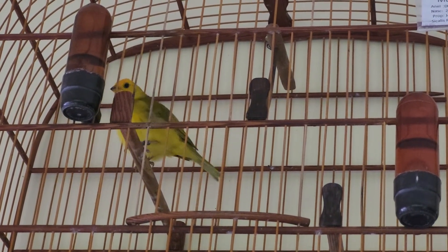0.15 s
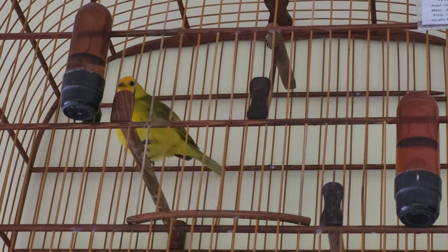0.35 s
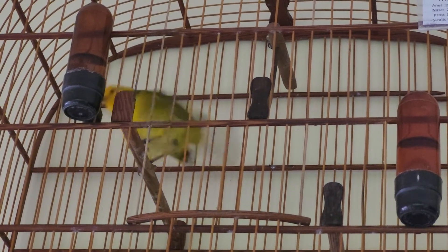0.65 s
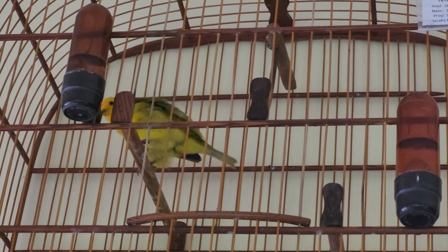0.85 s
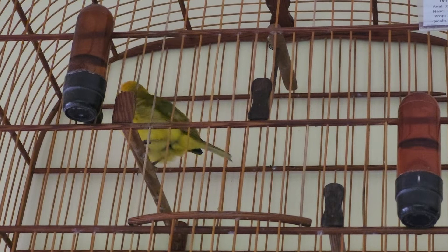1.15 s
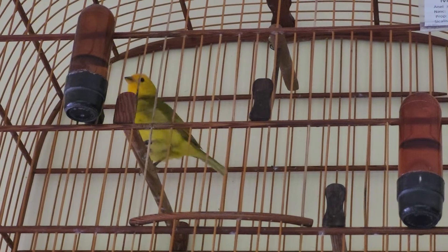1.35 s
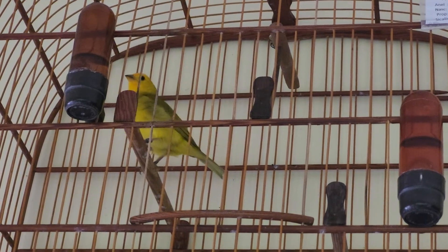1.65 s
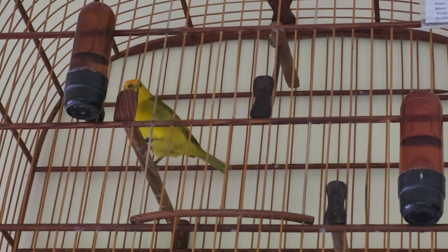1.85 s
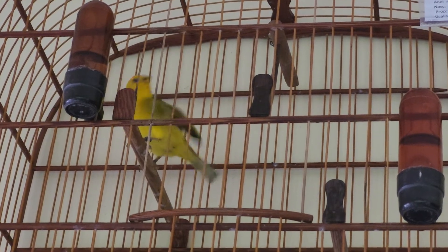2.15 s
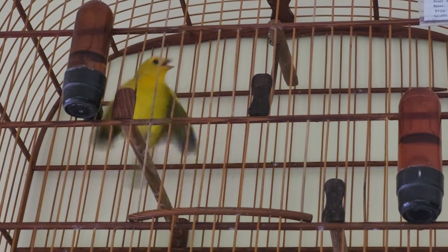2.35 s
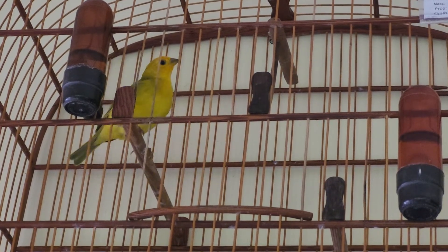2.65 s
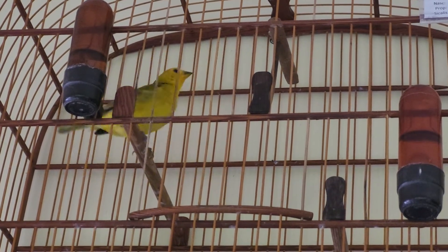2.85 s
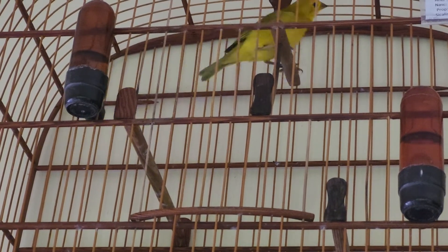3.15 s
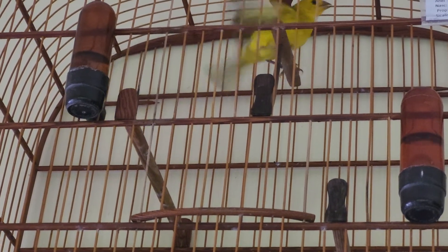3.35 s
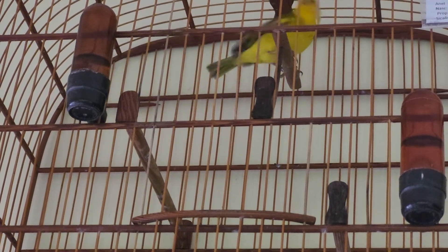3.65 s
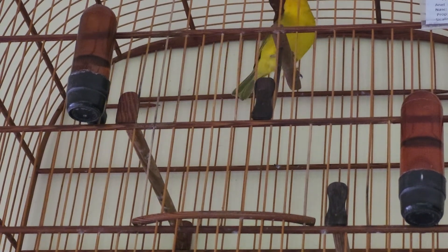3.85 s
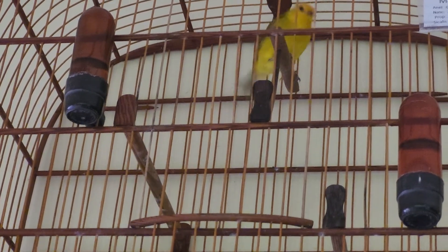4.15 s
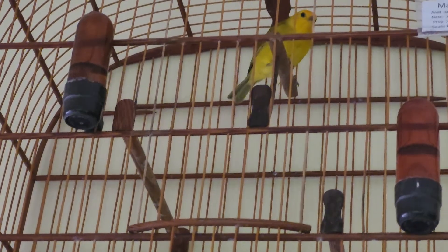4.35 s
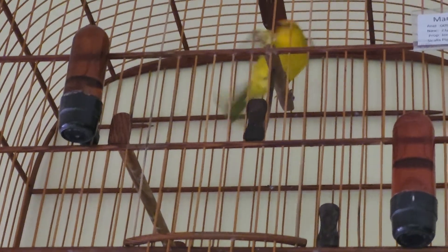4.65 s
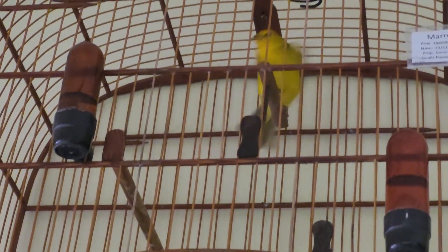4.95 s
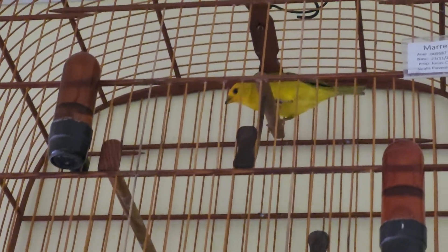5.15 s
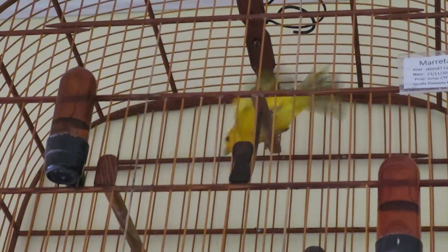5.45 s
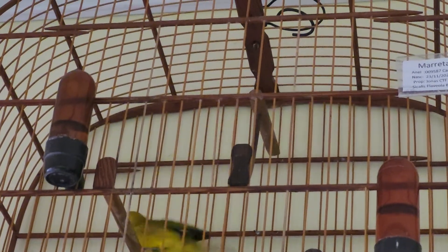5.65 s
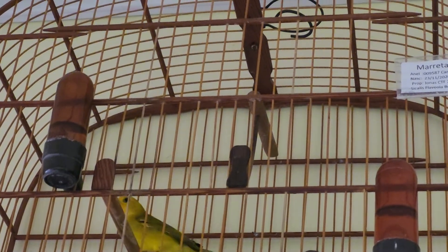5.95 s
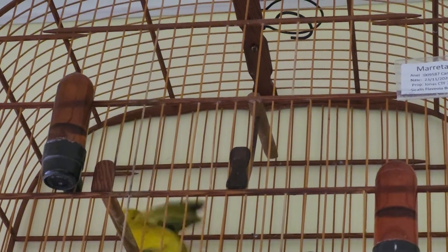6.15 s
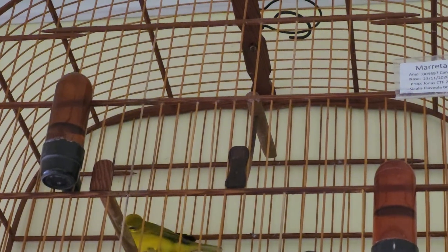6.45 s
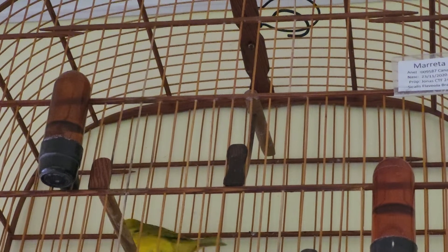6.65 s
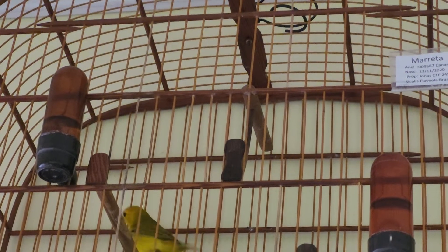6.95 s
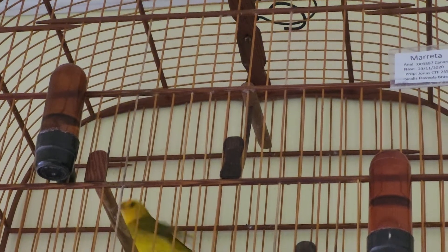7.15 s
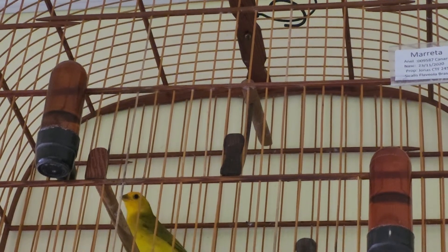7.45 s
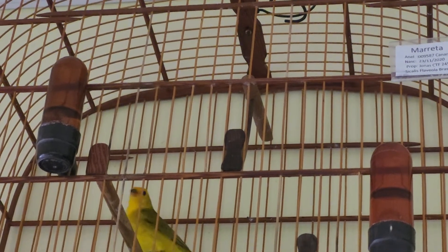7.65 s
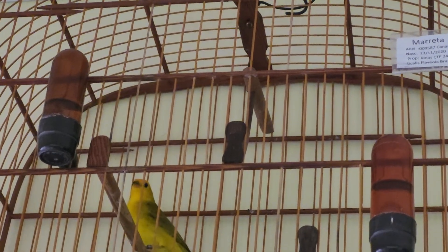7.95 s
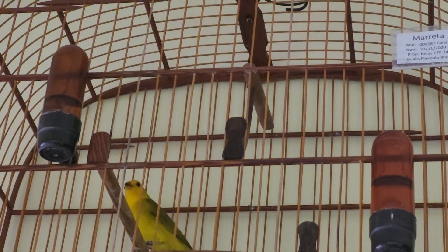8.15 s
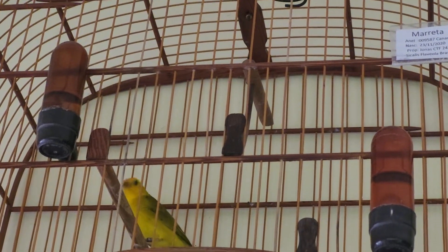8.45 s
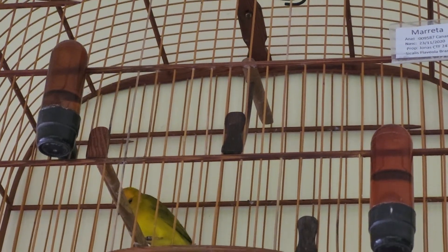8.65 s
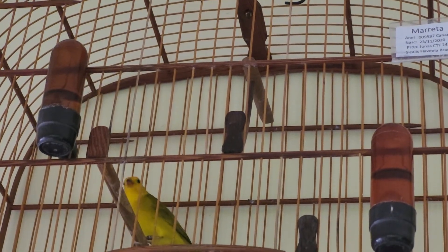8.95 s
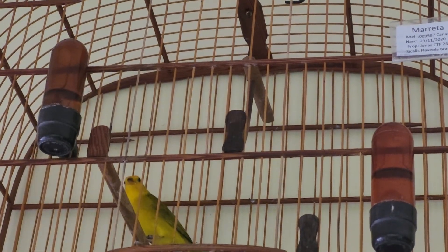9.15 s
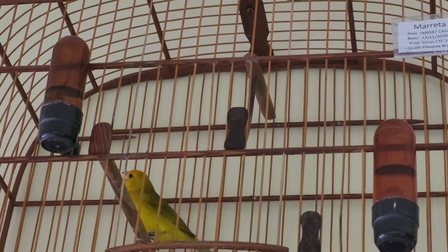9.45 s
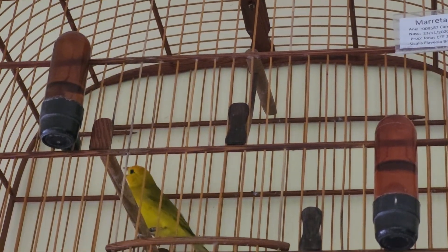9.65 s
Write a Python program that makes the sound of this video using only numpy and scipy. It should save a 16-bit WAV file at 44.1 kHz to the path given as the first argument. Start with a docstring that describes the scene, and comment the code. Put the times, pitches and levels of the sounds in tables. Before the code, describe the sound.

A small finch in a cage, close and slightly left in a hard-walled, echoing room. Six tiny, piercing, nearly pure chips around 8 kHz come at about 0.3, 1.5, 2.4, 3.4, 4.3 and 5.4 seconds, each dropping quickly onto its pitch and leaving a bright splash of echo. Faint dull ticks, claw scrapes and feather rustles accompany many chips, with small movements near 0.7, 4.0 and 5.7. From 6.65 the bird sings: a quick soft-to-loud pair, then sweeping falls near 7.1 and 7.7, a fast cluster at 8.1, a fuller run from 8.7 to 9.05, and another from 9.5 to 9.8, mostly plunging whistles with some rising ones. Very quiet traffic underneath hums and hisses, engines swelling around 3.3-4.5 and 5.5-7. Distant birds are only blurred echoes, clearest at the start and around 6.4.

```python
"""From the start, traffic hums, rumbles and hisses outside, swelling and sinking; far birds call as bare echo.
A caged finch in a hard-walled room gives six short chips, near-sine notes falling onto their pitch.
Dull ticks, scrapes (claws and feathers on the perch) and soft noise swells accompany many chips and
some song notes, and some fall between.
From 6.65 s the finch sings gliding whistles to the end; a decaying-noise echo smears every note."""
import sys
import numpy as np
from scipy import signal
from scipy.fft import rfft, irfft, next_fast_len
from scipy.io import wavfile
from scipy.ndimage import uniform_filter1d, minimum_filter1d

SR = 44100
rng = np.random.default_rng(int(sys.argv[2]) if len(sys.argv) > 2 else 0)


def materialize(psi):
    """Save the field psi as 16-bit PCM at rate SR to the path in sys.argv[1].

    A 1-D psi becomes a single channel; in a 2-D psi each row is a channel.
    """
    bounded = np.clip(np.atleast_2d(psi).T, -1, 1)
    quanta = np.round(bounded * 32767).astype(np.int16)
    wavfile.write(sys.argv[1], SR, quanta)


N = 433062

# finch chips; level applies 3 ms in, partial is the one at 1.5 x pitch:
# start_s, level_db, pitch_hz, left_minus_right_db, octave_db, partial_db, length_s
CHIPS = [(0.268, -11.5, 8048, 2, -41, -25, 0.01), (1.465, -12, 8040, 3, -23.5, -42, 0.012),
         (2.439, -11.5, 7767, 2, -9.5, -34.5, 0.0073), (3.39, -7, 7880, 1.5, -15, -45, 0.0057),
         (4.321, -9.5, 8096, 3, -30.5, -28.5, 0.0077), (5.385, -12.5, 8140, 5.5, -24, -31, 0.0088)]
# thin squeak ahead of a chip, level relative to it: offset_s, pitch_hz, level_db
CHIP_SQUEAK = [(-.01, 9630, -44.5), (-.006, 12460, -33.5), (0, 14500, -48)]
# finch song glides, levels before voice gain; bend > 1 moves fast then settles, < 1 holds then moves:
# start_s, length_s, from_hz, to_hz, bend, start_db, end_db, left_minus_right_db, octave_db
SONG = [(6.65, 0.022, 7000, 5930, 0.9, -32.5, -22.5, -1, -8.5),
        (6.681, 0.049, 8200, 3637, 1.83, -20, -14.5, 2.5, -16),
        (7.099, 0.051, 7925, 8630, 1.48, -12.5, -17.5, 5, -37),
        (7.152, 0.059, 8900, 3670, 1.84, -14, -15, 1.5, -22),
        (7.687, 0.07, 6210, 2374, 1.35, -13, -19, 3.5, -14.5),
        (8.117, 0.013, 9150, 7400, 0.79, -14.5, -17, 9, -14),
        (8.137, 0.0336, 8850, 6950, 0.48, -11, -14, 2, -16.5),
        (8.196, 0.037, 6370, 4067, 2.6, -9.5, -16.5, 2, -17.5),
        (8.225, 0.032, 4100, 2770, 1.5, -15.5, -17.5, 7, -7),
        (8.713, 0.031, 5030, 5626, 2.2, -29, -4.5, 5, -22.5),
        (8.742, 0.019, 5620, 6300, 1.2, -20, -22, 4.5, -15),
        (8.761, 0.051, 6310, 5956, 1.75, -13, -28, -3, -11.5),
        (8.832, 0.043, 6050, 3995, 2.15, -11.5, -19.5, 2.5, -15.5),
        (8.948, 0.014, 9230, 6900, 0.77, -17.5, -17, 3.5, -16),
        (8.967, 0.04, 8890, 6840, .4, -12.5, -19.5, 3.5, -18),
        (9.019, 0.055, 6176, 2760, 1.5, -13, -15, 3.5, -16),
        (9.47, 0.087, 4846, 6185, 1.29, -16.5, -8.5, 1, -17),
        (9.598, .046, 6060, 3860, 2.08, -8.5, -21.5, 2.5, -15),
        (9.712, 0.016, 8940, 7290, .6, -11, -22, 9, -14.5),
        (9.736, 0.027, 8650, 7030, 0.27, -14.5, -15, 4.5, -19),
        (9.783, 0.05, 6070, 2640, 1.66, -7, -32.5, -1, -18)]
CHIP_FALL = 0.088  # start above settled pitch, fraction
HIGH_HZ, HIGH_PARTIAL_DB = 8000, -32
ECHO_DB = 2.5  # echo energy over direct sound


def finch():
    """Chips that start high and settle, then gliding song; direct sound plus wall echo."""
    dry = np.zeros((2, N))
    for start_s, level_db, pitch_hz, pan_db, octave_db, partial_db, length_s in CHIPS:
        rows = [(start_s, pitch_hz * (1 + CHIP_FALL), level_db - 17),
                (start_s + 0.003, pitch_hz, level_db),
                (start_s + length_s, pitch_hz * 0.9974, level_db + 6)]
        add_note(dry, pan_db, octave_db, rows, partial_db=partial_db, edge_s=0.0013,
                 waver=0.0014, air_db=-23.5)
        squeak = np.add(CHIP_SQUEAK, (start_s, 0, level_db))
        add_note(dry, pan_db, -80, squeak, waver=0.031, air_db=-9.0)
    for *note, pan_db, octave_db in SONG:
        from_hz, to_hz = note[2:4]
        # notes that stay high carry the in-between partial, like the chips
        stays_high = from_hz > HIGH_HZ and to_hz > HIGH_HZ * 0.8
        partial_db = HIGH_PARTIAL_DB if stays_high else -80
        add_note(dry, pan_db, octave_db, glide(*note), partial_db=partial_db,
                 edge_s=0.0029, waver=0.0038)
    response = undb(ECHO_DB) * room(rise_s=0.00067)
    response[:, 0] += 1  # direct sound
    return signal.oaconvolve(dry, response, axes=1)[:, :N]


# distant birds, levels before voice gain and echo:
# start_s, length_s, from_hz, to_hz, bend, start_db, end_db, octave_db
FAR_BIRDS = [(0, 0.059, 7900, 6760, 1.1, -50, -35, -20),
             (0.042, 0.057, 7100, 3720, 1.23, -38.5, -35, -18.5),
             (1.696, 0.28, 4000, 4620, 1.05, -71.5, -72, -54),
             (1.951, 0.24, 4600, 3490, 0.8, -73, -70, -53),
             (2.867, 0.034, 6960, 6750, 1.08, -70, -76, -28.5),
             (3.0, .1, 5200, 3830, 0.95, -65.5, -92, -39), (3.425, .13, 4660, 3470, 0.6, -64, -70, -37),
             (4.603, 0.25, 4510, 4520, 0.96, -67.5, -80, -35),
             (5.465, .06, 6790, 5770, 0.73, -52, -53, -53),
             (5.807, 0.074, 4440, 4470, 0.92, -65.5, -68, -45),
             (5.939, 0.05, 7810, 7680, 0.73, -51.5, -48.5, -30),
             (5.975, 0.04, 7930, 3850, 1.33, -52.5, -45.5, -30),
             (6.392, 0.035, 6400, 3880, 1.0, -49.5, -33.5, -16),
             (6.424, .045, 6530, 3860, 1.31, -33.5, -38, -14),
             (6.469, 0.071, 3884, 6620, 1.22, -40, -41.5, -18),
             (7.602, 0.045, 7690, 5250, 1.18, -40.5, -36, -12)]
FAR_RISE_S = 0.071


def neighbours():
    """Far birds: glides heard through a slowly rising echo, no direct sound."""
    dry = np.zeros((2, N))
    for *note, octave_db in FAR_BIRDS:
        length_s = note[1]
        add_note(dry, 0, octave_db, glide(*note), edge_s=0.01, waver=0.02 + 0.2 * length_s)
    return signal.oaconvolve(dry, room(rise_s=FAR_RISE_S), axes=1)[:, :N]


# bird voice strength by pitch: pitch_hz, gain_db
VOICE = [(2500, -22), (3300, -8), (3800, -4), (4600, -1.5), (6200, -0.5), (7400, 2.5), (8800, -4)]
LINGER = 1.1  # > 1: each glide leaves its first pitch gently


def glide(start_s, length_s, from_hz, to_hz, bend, start_db, end_db):
    """Rows (s, Hz, dB) of one pitch slide, level weighted by voice strength."""
    x = np.linspace(0, 1, num=24)
    pitch_hz = to_hz * (from_hz / to_hz) ** ((1 - x ** LINGER) ** bend)
    voice_db = np.interp(pitch_hz, *np.transpose(VOICE))
    level_db = start_db + (end_db - start_db) * x + voice_db
    return np.c_[start_s + length_s * x, pitch_hz, level_db]


OVERTONE_HZ, THIRD_DB = 12080, -9.5  # open beak favours overtones above; third relative to octave


def beak(f):
    """Overtone gain: steep high-pass, zero near the sampling limit."""
    return (f < SR / 2.2) / np.sqrt(1 + (OVERTONE_HZ / f) ** 12)


def add_note(out, pan_db, octave_db, rows, partial_db=-80, edge_s=0.0022, waver=0., air_db=-44):
    """Add a wavering near-sine with faint overtones, a 1.5 x pitch partial and air hiss."""
    row_s, row_hz, row_db = np.transpose(rows)
    i = np.arange(max(int(row_s[0] * SR), 0), min(int(row_s[-1] * SR), N))
    t = i / SR
    wobble = uniform_filter1d(rng.standard_normal(len(i)), size=150)
    wobble = unit(uniform_filter1d(wobble, size=150))
    pitch_hz = uniform_filter1d(np.interp(t, row_s, row_hz), size=90, mode="nearest")
    pitch_hz = pitch_hz * (1 + waver * wobble)
    phase = 2 * np.pi * (np.cumsum(pitch_hz) / SR + rng.random())
    tone = np.sin(phase)
    tone += undb(octave_db) * beak(2 * pitch_hz) * np.sin(2 * phase)
    tone += undb(octave_db + THIRD_DB) * beak(3 * pitch_hz) * np.sin(3 * phase)
    tone += undb(partial_db) * np.sin(3 * phase / 2)
    highpass = signal.butter(6, OVERTONE_HZ, "high", fs=SR, output="sos")
    tone += undb(air_db) * signal.sosfilt(highpass, rng.standard_normal(len(i)))
    edge = np.clip(np.minimum(t - row_s[0], row_s[-1] - t) / edge_s, 0, 1)
    fade = np.sin(np.pi / 2 * edge) ** 2
    level = undb(np.interp(t, row_s, row_db))
    out[:, i] += np.sqrt(2) * tone * level * fade * sides(pan_db)


# echo decay time to -60 dB by band: band_hz, t60_s
ROOM_T60 = [(2500, 0.87), (5000, 0.86), (8000, 0.71), (12000, 0.64), (16000, 0.36)]
EARLY_DB, EARLY_S = 10.5, 0.058  # nearest walls: strong short cluster on top of the tail


def room(rise_s):
    """Diffuse echo per ear, energy 1: noise bands dying at their own rates."""
    t = np.arange(SR) / SR
    band_hz, t60_s = np.transpose(ROOM_T60)
    tail = 0
    for k in range(len(band_hz)):
        weights = np.eye(len(band_hz))[k]
        band = coloured(SR, lambda f: np.sqrt(np.abs(np.interp(f, band_hz, weights))), 0.3)
        tail = tail + band * undb(-60 * t / t60_s[k])
    # echoes start uneven, then even out
    steps = np.repeat(rng.standard_normal((2, SR // 60)), 60, axis=1)
    lumps = undb(4 * np.exp(-t / 0.04) * steps)
    early = 1 + undb(EARLY_DB) * np.exp(-t / EARLY_S)
    tail = tail * lumps * early * (1 - np.exp(-t / rise_s))
    return tail / np.sqrt(np.sum(tail ** 2, axis=1, keepdims=True))


# dull low ticks, step level before the low-pass: start_s, level_db, left_minus_right_db
TICKS = [(0.291, -32.5, 17.5), (1.469, -52, 44.5), (2.443, -31.5, 11), (4.041, -53, -12.5),
         (4.325, -29, 14), (5.382, -32.5, 12), (5.699, -41, 2.5), (7.117, -32.5, 28.5), (7.153, -27, 13),
         (7.161, -21.5, 12.5), (8.136, -30.5, 19), (8.166, -27.5, 27), (8.952, -33, 18.5), (9.034, -34, 15)]
TICK_HZ = 113.3  # sag corner


def ticks():
    """Negative step that sags back through zero, low-passed: a bass-heavy click."""
    steps = np.zeros((2, N))
    for start_s, level_db, pan_db in TICKS:
        steps[:, int(start_s * SR)] = -undb(level_db) * sides(pan_db)[:, 0]
    t = np.arange(SR // 20) / SR
    shape = np.exp(-2 * np.pi * TICK_HZ * t) - 0.12 * np.exp(-t / 0.026)
    clicks = signal.oaconvolve(steps, shape[None], axes=1)[:, :N]
    return signal.sosfilt(signal.butter(2, 1600, fs=SR, output="sos"), clicks)


# claws and feathers on the perch, level before grain and decay: start_s, level_db, centre_hz, decay_s
SCRAPES = [(.275, -61, 2520, 0.029), (0.722, -74, 1500, 0.062), (0.721, -66.5, 11860, 0.097),
           (1.467, -62, 3520, 0.021), (2.445, -64.5, 2470, 0.072), (3.389, -73, 4025, .02),
           (4.03, -61.5, 2720, 0.016), (5.386, -55, 4000, 0.017), (5.693, -57, 1830, 0.059)]


def scrapes():
    """Broad noise bursts, stepped in level for grain, decaying exponentially."""
    out = np.zeros((2, N))
    t = np.arange(SR // 4) / SR
    for start_s, level_db, centre_hz, decay_s in SCRAPES:
        burst = unit(coloured(len(t), lambda f: 1 / (1 + (f / centre_hz - centre_hz / f) ** 2), 0.099))
        grain = undb(4 * np.repeat(rng.standard_normal(SR // 420), 105))
        first = int(start_s * SR)
        out[:, first:first + len(t)] += undb(level_db) * burst * grain * np.exp(-t / decay_s)
    return out


# soft swells from cage or street, level before envelope, length is its time scale:
# start_s, centre_hz, level_db, length_s
SWELLS = [(0.268, 58, -55.5, 0.33), (1.445, 55, -62, .25), (1.453, 280, -54, 0.07), (2.439, 54, -53, .35),
          (2.47, 384, -56.5, 0.16), (2.8, 190, -68, 0.31), (4.02, 246, -51, 0.081),
          (4.998, 252.2, -55.5, 0.29), (5.7, 370.3, -48.5, 0.22), (8.14, 294, -50.5, 0.1),
          (4.0, 1730, -69.5, 2.32), (5.213, 1563, -63.5, 2.8), (3.36, 600, -72.5, 0.29)]


def swells():
    """Narrow noise bands that rise fast and fade."""
    out = np.zeros((2, N))
    for start_s, centre_hz, level_db, length_s in SWELLS:
        n = int(1.2 * length_s * SR)
        x = np.arange(n) / SR / length_s
        band = unit(coloured(n, lambda f: 1 / (1 + ((f - centre_hz) / (0.085 * centre_hz)) ** 2), 0.8))
        envelope = 5 * x * np.exp(-(2 * x) ** 2)
        first = int(start_s * SR)
        out[:, first:first + n] += undb(level_db) * band * envelope * sides(1.4)
    return out


# traffic noise levels: time_s, rumble_db, hiss_db
STREET = [(0.0, -65, -69.5), (1.39, -69, -71), (1.67, -61.5, -69), (2.0, -70.5, -71), (3.36, -60.5, -68.5),
          (3.69, -56, -62.5), (4.92, -60, -59.5), (5.63, -55, -55.5), (6.02, -56.5, -61), (6.76, -54, -56),
          (7.38, -61.5, -59.5), (8.81, -63, -66.5), (9.05, -60.5, -62), (9.82, -56.5, -60.5)]
# low room resonances, relative level before flare: centre_hz, width_hz, level_db
RUMBLE = [(110, 13, -2), (166, 44, 4), (249.4, 61, 3), (304, 100, 0), (400.7, 87, 0)]
# hiss spectrum, relative, cut below 200 Hz: freq_hz, density_db_per_hz
HISS = [(260, -33.5), (450, -5.5), (1010, -12), (1500, -12.5), (2000, -12.5), (2350, -19.5), (3280, -21.5),
        (3930, -18.5), (5220, -23.5), (7930, -23), (9070, -28), (12600, -30.5), (16000, -41.5)]
# engines outside, level before wander: time_s, hum_hz, level_db
ENGINE_REVVING = [(0.0, 59.86, -67), (0.96, 55.1, -68), (1.16, 59.4, -76.5), (1.52, 54.27, -59),
                  (2.37, 53.1, -67), (2.59, 52.4, -54.5), (2.78, 53.2, -71), (3.29, 54.9, -47.5),
                  (3.64, 58.4, -53.5), (4.31, 64, -43.5), (4.59, 73.6, -49), (4.78, 73.9, -62),
                  (4.91, 81.1, -62), (5.25, 88.4, -68)]
# same columns: time_s, hum_hz, level_db
ENGINE_IDLING = [(5.1, 43.46, -65), (5.45, 45.76, -46.5), (5.89, 47.46, -41), (6.76, 47.4, -38.5),
                 (7.23, 46.84, -52.5), (8.12, 41.5, -48.5), (8.43, 40, -59), (8.9, 35.1, -57),
                 (9.3, 35.5, -60)]
# same columns: time_s, hum_hz, level_db
ENGINE_LATE = [(7.6, 60.15, -59), (8.12, 63.4, -48.5), (8.43, 61.4, -58.5), (8.87, 71.9, -59),
               (9.49, 70.2, -52.5), (9.82, 75.3, -56)]
THUD_DB = 1.5  # noise near 50 Hz, relative to rumble


def street():
    """Engine hums, noise in the room's low resonances, thud noise and broad hiss."""
    rumble_db, hiss_db = along(STREET, 1), along(STREET, 2)
    engines = hum(ENGINE_REVVING) + hum(ENGINE_IDLING) + hum(ENGINE_LATE)
    thud = unit(coloured(N, lambda f: 1 / (1 + ((f - 50) / 20) ** 2), 0.75)) * undb(3 * walk(3.8))
    rumble = 0
    for centre_hz, width_hz, level_db in RUMBLE:
        flare_db = 3 * walk(5)  # independent per resonance
        band = coloured(N, lambda f: 1 / np.sqrt(1 + (2 * (f - centre_hz) / width_hz) ** 4), 1.0)
        rumble = rumble + undb(level_db + flare_db) * band
    rumble = unit(rumble) * sides(1.9)
    freq_hz, density_db = np.transpose(HISS)
    spectrum = lambda f: undb(np.interp(np.log(f), np.log(freq_hz), density_db)) * (f > 200)
    hiss = unit(coloured(N, spectrum, 0.25))
    return engines + undb(rumble_db) * (rumble + undb(THUD_DB) * thud) + undb(hiss_db) * hiss


def hum(engine):
    """Firing tone with faint third harmonic and wandering level; silent outside its table."""
    t = np.arange(N) / SR
    lead_rad = np.array([[0.3], [0]])
    phase = 2 * np.pi * np.cumsum(along(engine, 1)) / SR + lead_rad
    active = 1. * (t >= engine[0][0]) * (t <= engine[-1][0])
    gate = uniform_filter1d(active, size=8000, mode="nearest")
    level = undb(along(engine, 2) + 1.5 * walk(4.1))
    tone = np.sin(phase) + undb(-22) * np.sin(3 * phase)
    return np.sqrt(2) * gate * level * tone * sides(-1.5)


def along(table, column):
    """Time-table column interpolated to every sample."""
    return np.interp(np.arange(N) / SR, np.array(table)[:, 0], np.array(table)[:, column])


def walk(rate_hz):
    """Random values at rate_hz joined by straight lines."""
    return np.interp(np.arange(N) * rate_hz / SR, np.arange(N // 100), rng.standard_normal(N // 100))


def coloured(n, gain, alike):
    """Stereo noise shaped by gain(Hz); alike is the left-right correlation."""
    m = next_fast_len(n, real=True)
    freq_hz = np.arange(m // 2 + 1) * SR / m + 1  # +1 avoids zero
    mid, side = irfft(rfft(rng.standard_normal((2, m))) * gain(freq_hz), m)[:, :n]
    c = np.clip(alike, 0, 1)
    return np.sqrt((1 + c) / 2) * mid + np.sqrt((1 - c) / 2) * side * np.array([[1], [-1]])


def undb(db):
    """Decibels to amplitude."""
    return 10 ** (np.asarray(db) / 20)


def unit(x):
    """Scale to rms 1."""
    return x / np.sqrt(np.mean(x ** 2))


def sides(pan_db):
    """Left and right gains as a column, from left minus right dB."""
    return undb(np.array([[pan_db / 2], [-pan_db / 2]]))


def scene():
    """Sum of all sources."""
    return finch() + neighbours() + ticks() + scrapes() + swells() + street()


LEFT_LEAD_S, TOP_HZ = 0.00046, 15900


def record(dry):
    """Left microphone hears all sooner; fast limiter holds peaks, then a steep low-pass."""
    lag = max(int(LEFT_LEAD_S * SR), 1)
    pair = np.array([dry[0], np.r_[np.zeros(lag), dry[1, :-lag]]])
    needed_gain = np.minimum(1, 0.96 / (np.abs(pair) + 1e-9))
    headroom = minimum_filter1d(needed_gain, size=133, axis=1)
    held = pair * uniform_filter1d(headroom, size=133, axis=1)
    return signal.sosfilt(signal.ellip(10, 0.2, 80, TOP_HZ, fs=SR, output="sos"), held)


dry = scene()
out = record(dry)
materialize(out)
```